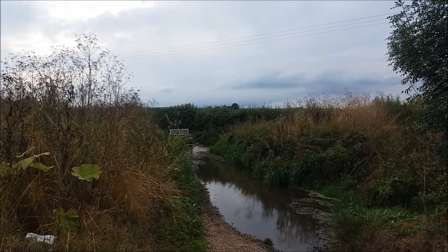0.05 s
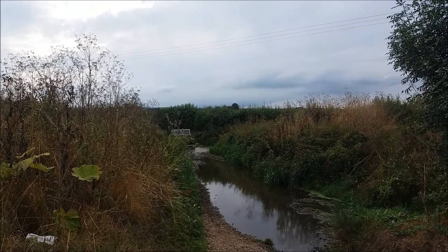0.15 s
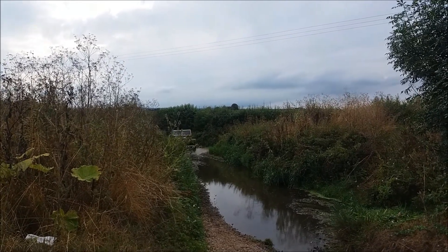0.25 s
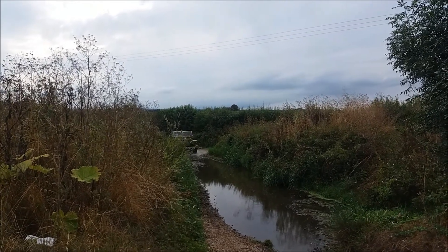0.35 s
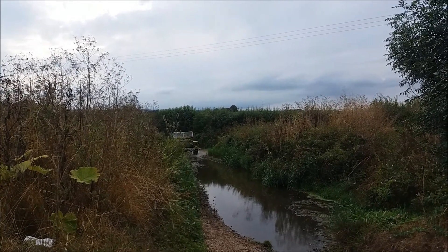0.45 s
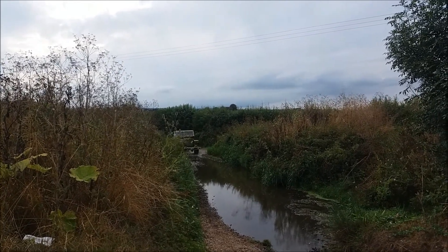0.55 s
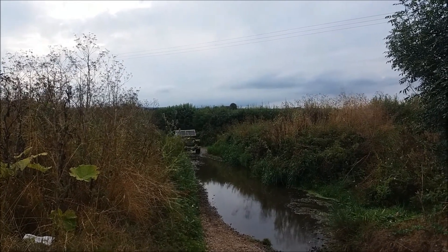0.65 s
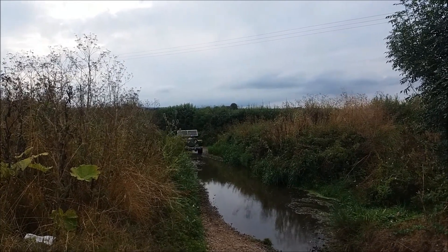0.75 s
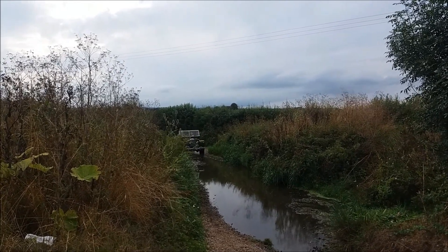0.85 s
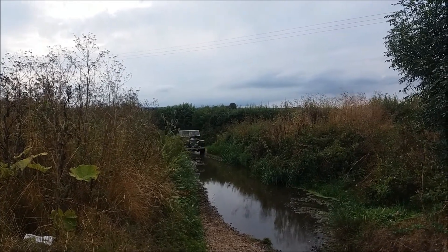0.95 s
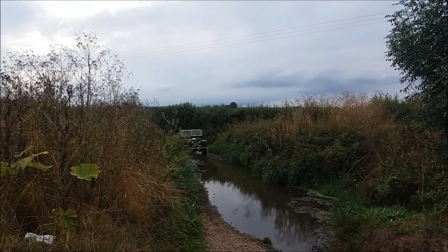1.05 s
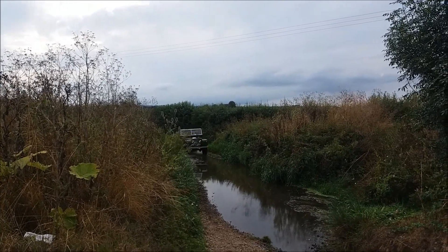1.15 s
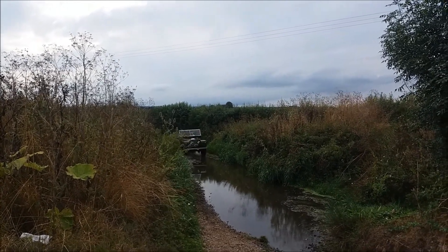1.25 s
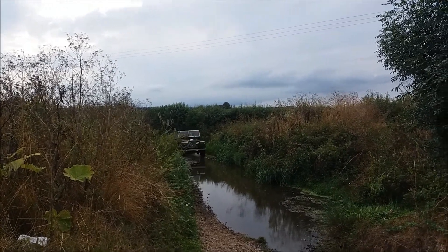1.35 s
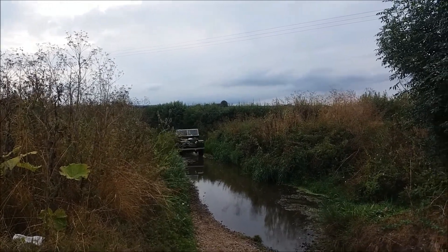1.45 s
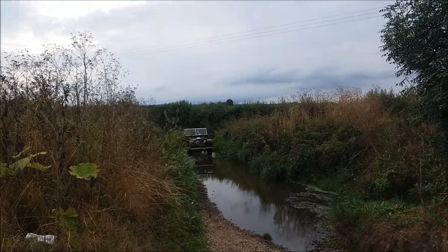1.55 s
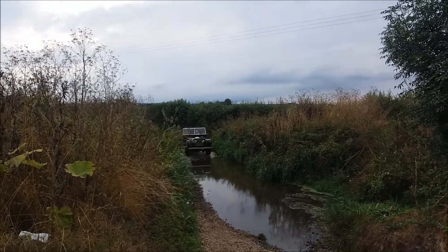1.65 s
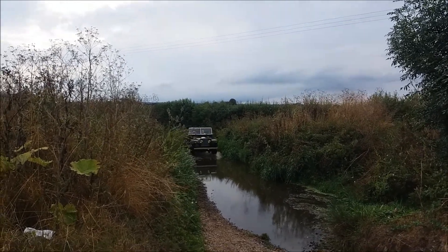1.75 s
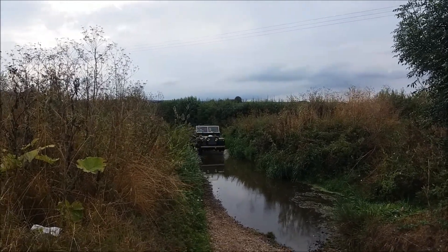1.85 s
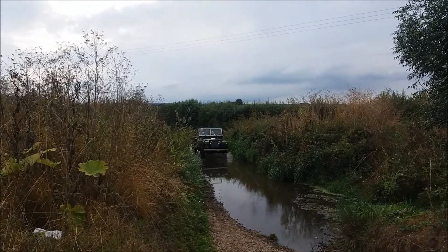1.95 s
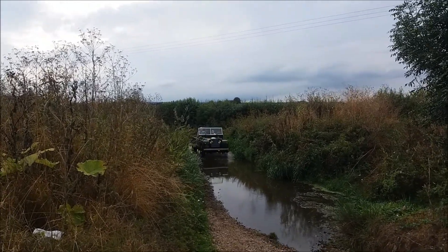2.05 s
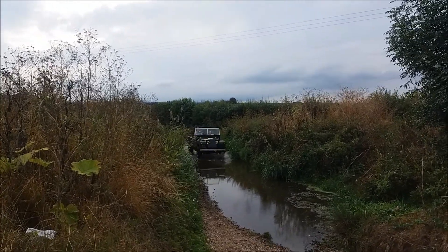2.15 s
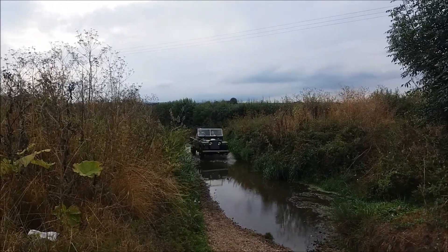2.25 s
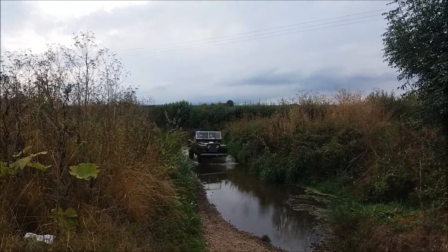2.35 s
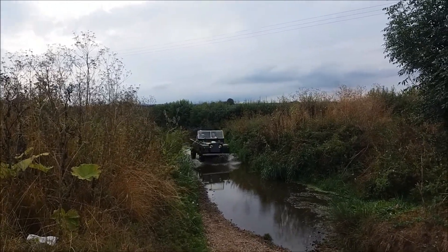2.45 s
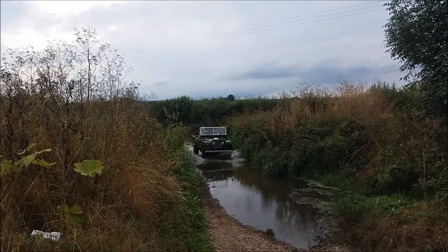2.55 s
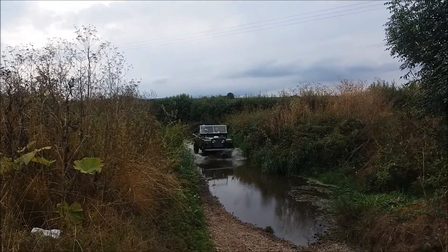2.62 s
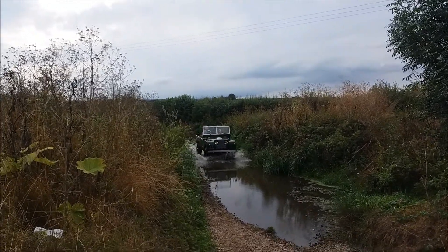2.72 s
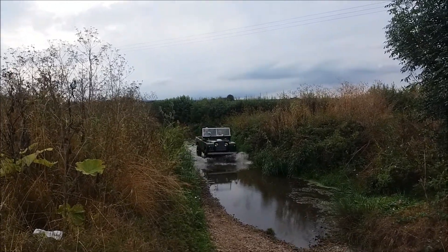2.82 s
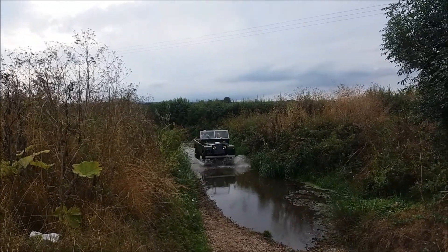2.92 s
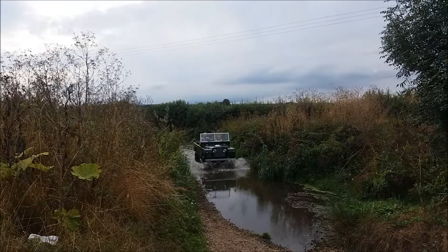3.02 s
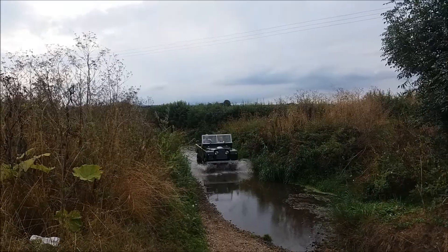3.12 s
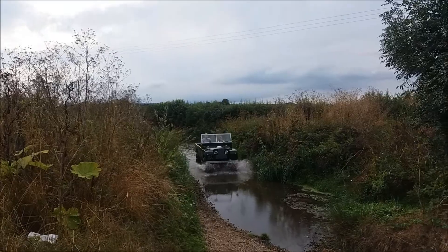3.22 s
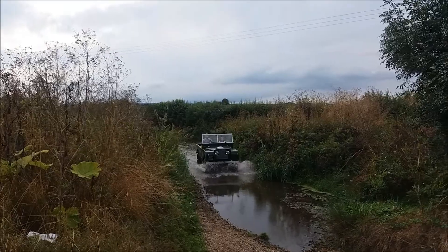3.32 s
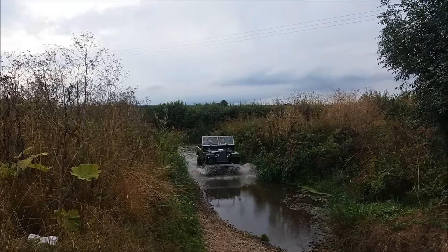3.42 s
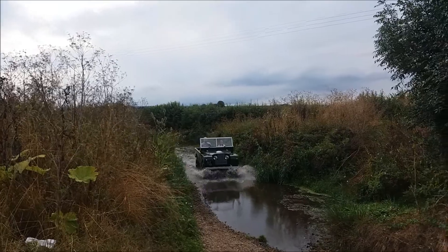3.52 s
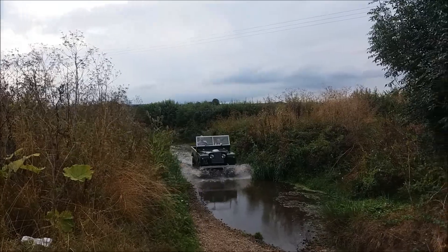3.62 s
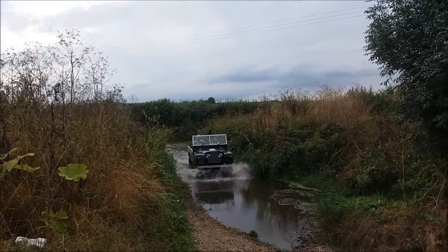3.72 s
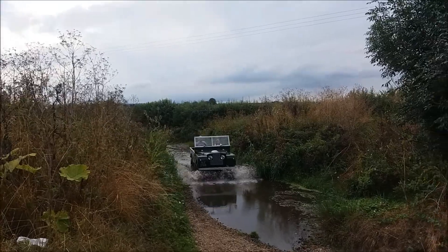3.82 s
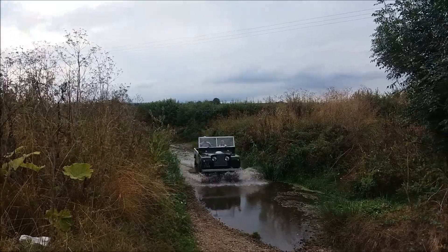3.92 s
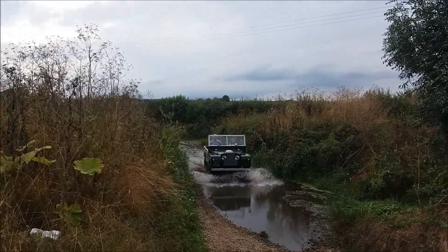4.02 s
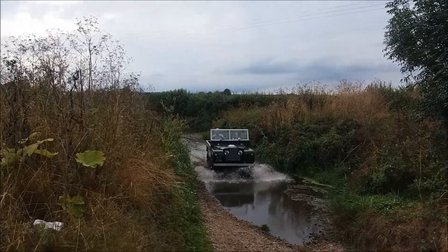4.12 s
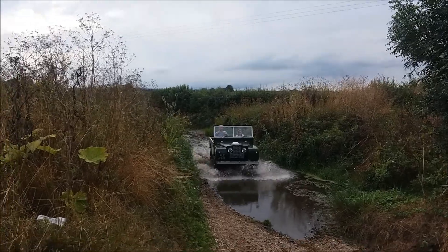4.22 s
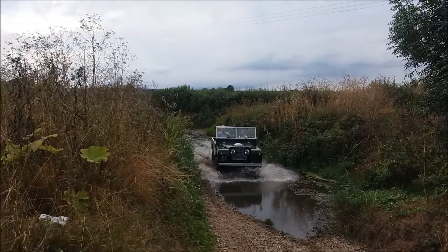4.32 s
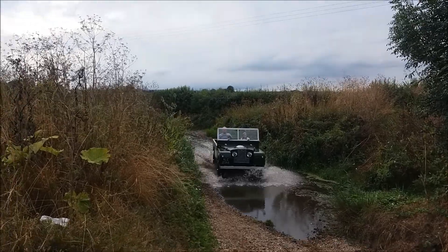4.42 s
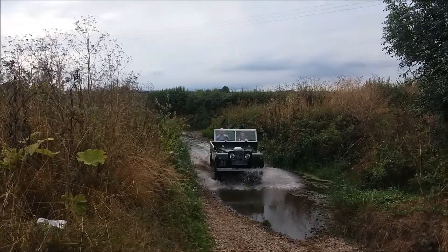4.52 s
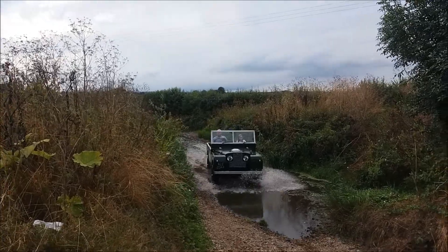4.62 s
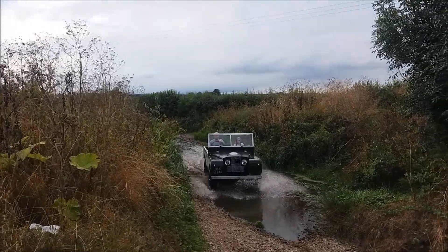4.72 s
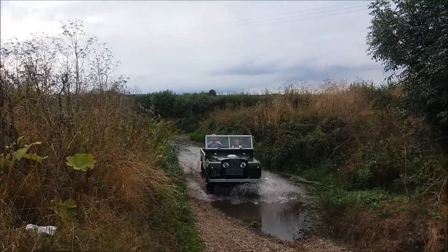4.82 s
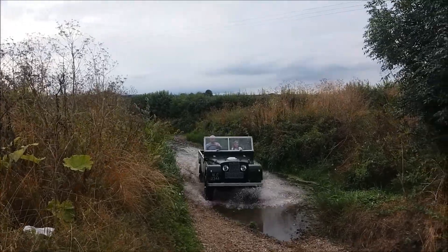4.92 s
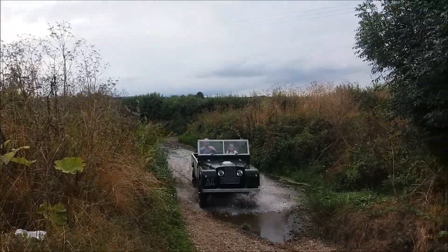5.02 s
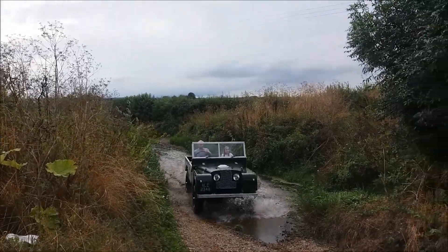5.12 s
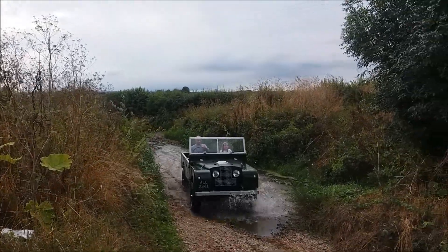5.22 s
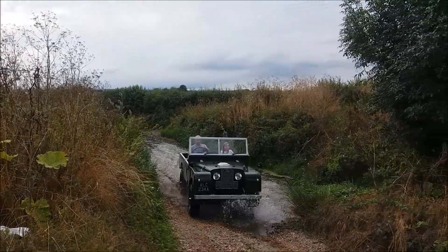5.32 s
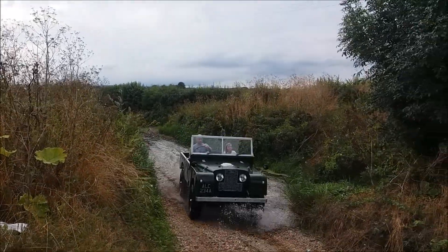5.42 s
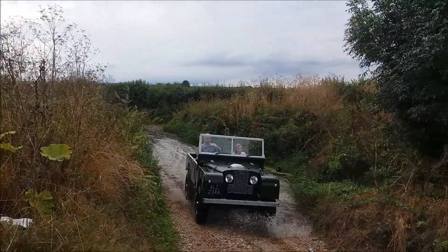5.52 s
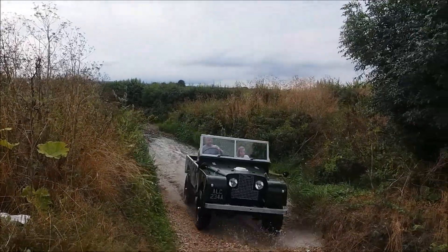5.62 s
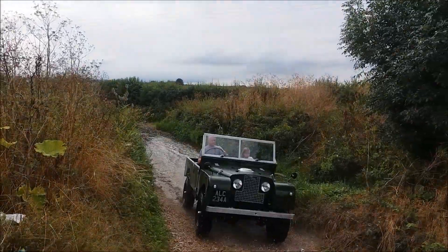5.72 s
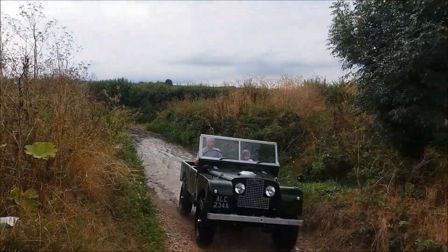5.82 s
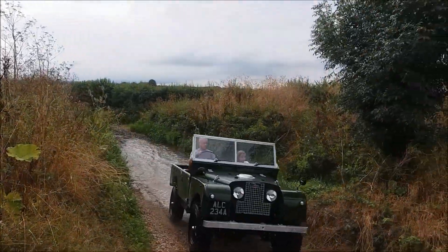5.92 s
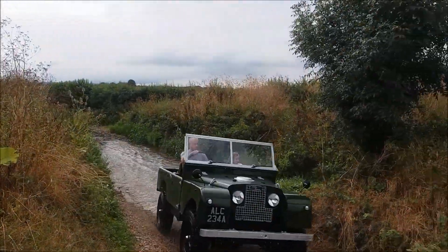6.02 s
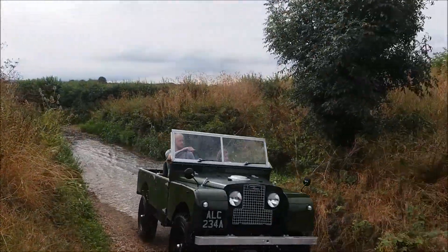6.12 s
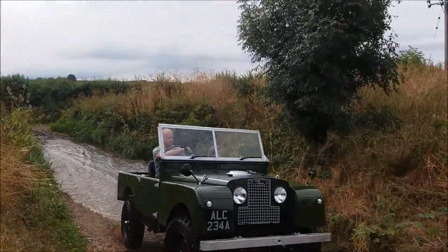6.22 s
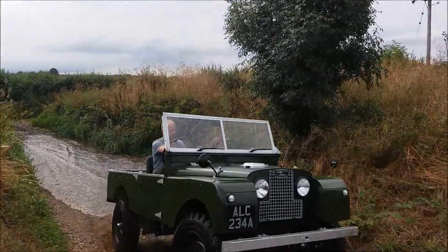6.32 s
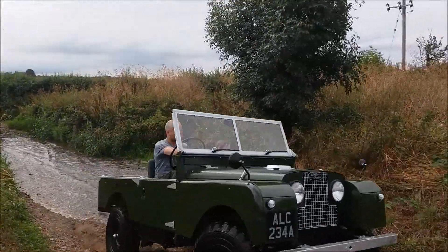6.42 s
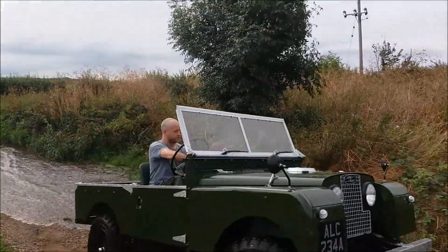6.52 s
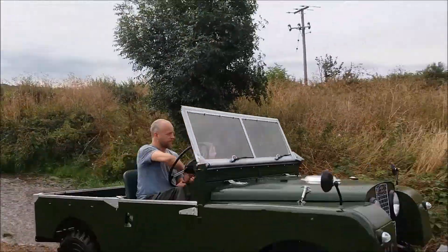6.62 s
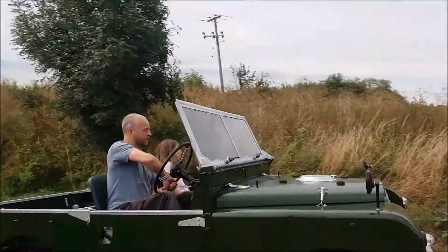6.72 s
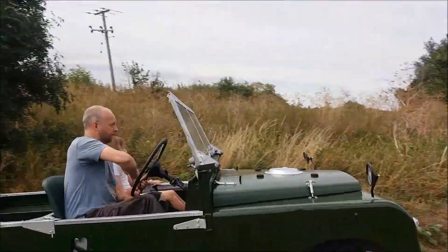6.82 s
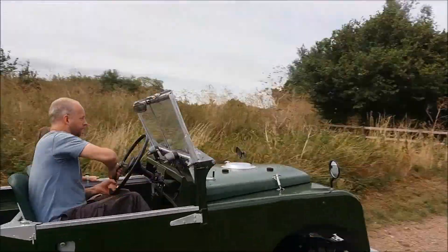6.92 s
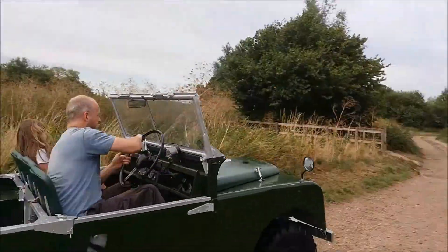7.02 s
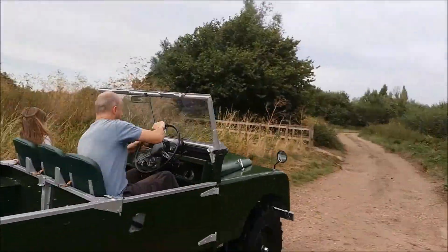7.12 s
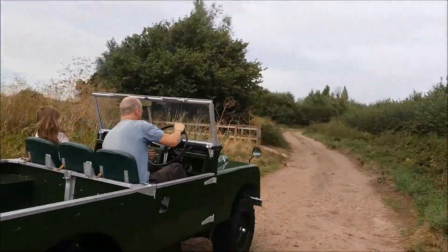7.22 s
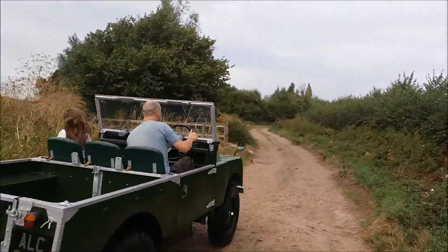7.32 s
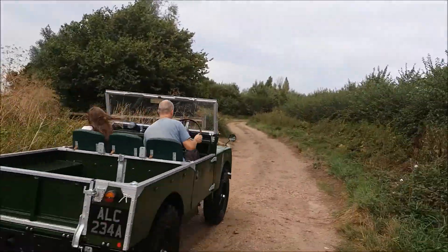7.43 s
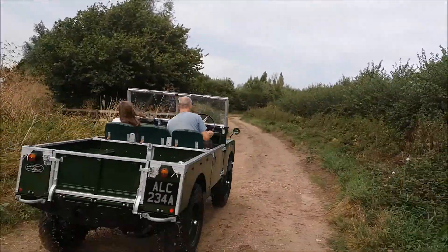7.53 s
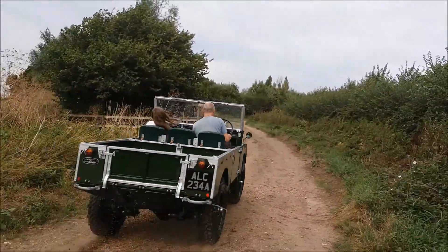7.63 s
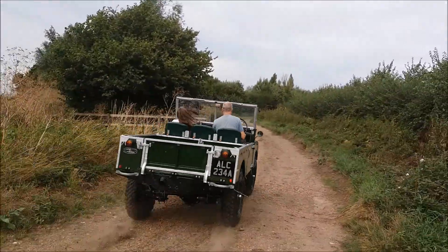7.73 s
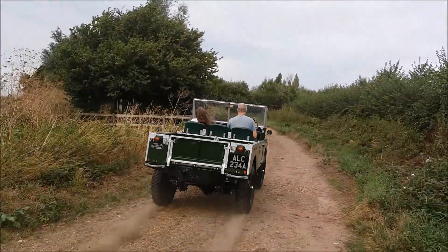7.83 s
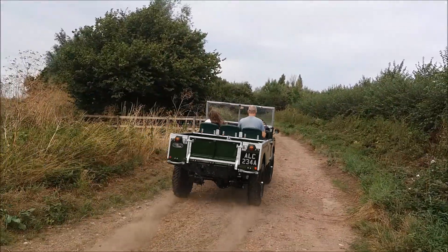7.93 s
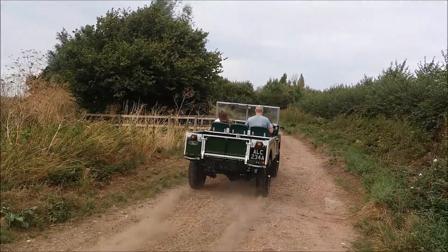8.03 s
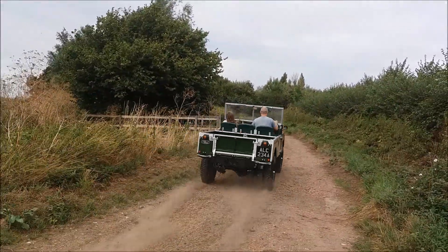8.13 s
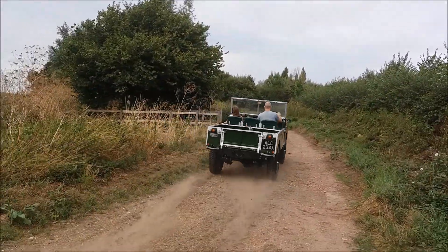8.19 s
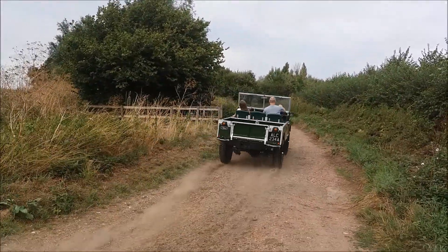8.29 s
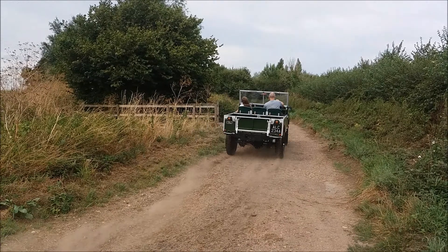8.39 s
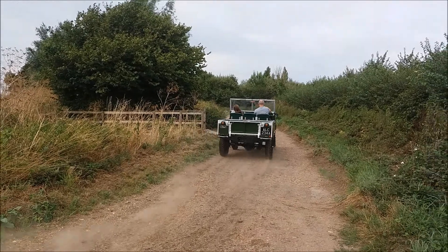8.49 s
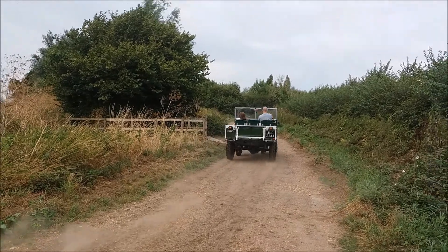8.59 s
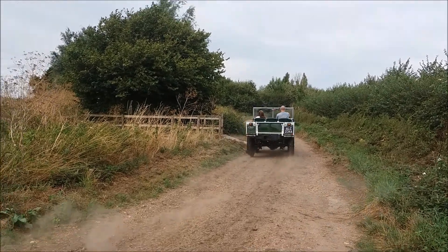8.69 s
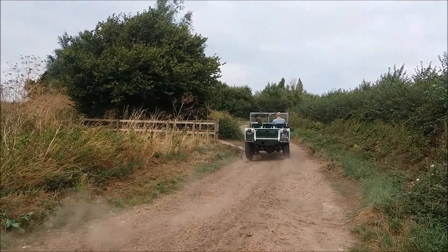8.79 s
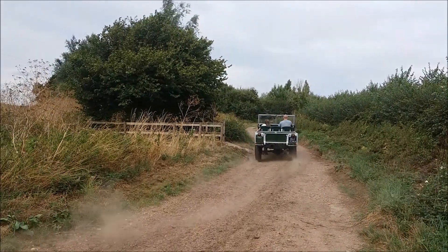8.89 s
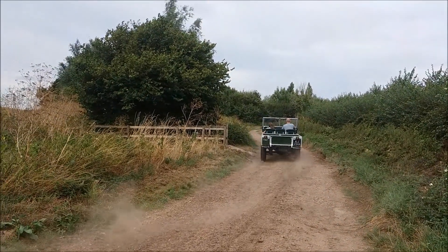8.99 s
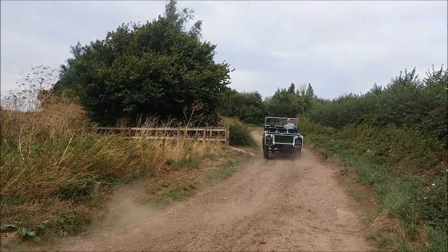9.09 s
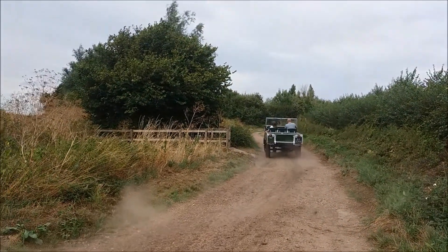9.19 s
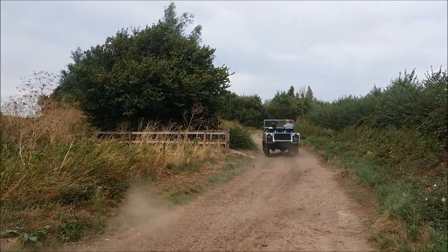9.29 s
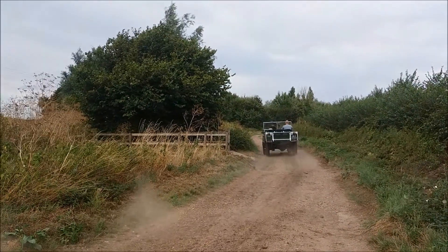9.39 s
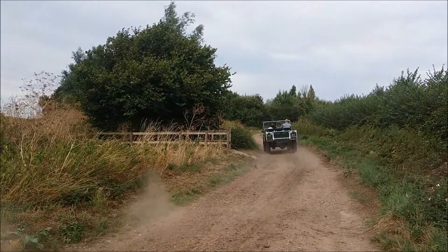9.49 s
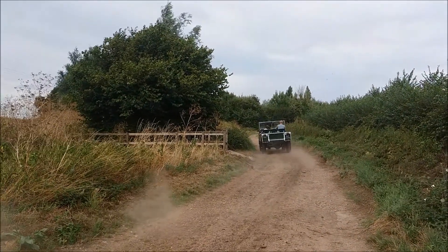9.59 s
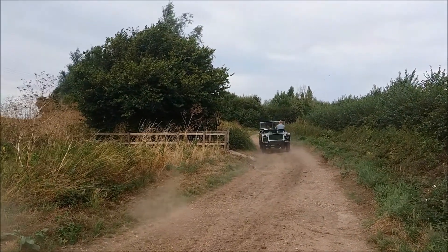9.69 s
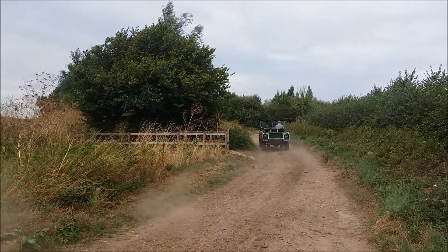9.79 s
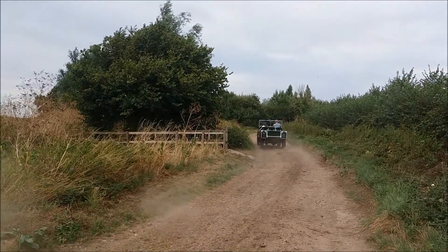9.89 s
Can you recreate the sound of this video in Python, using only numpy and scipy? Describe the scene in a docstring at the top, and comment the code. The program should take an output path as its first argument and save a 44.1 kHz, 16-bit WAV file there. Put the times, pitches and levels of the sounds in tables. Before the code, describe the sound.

Outdoors at a fixed microphone beside a flooded track, an old open V8 off-road vehicle approaches with a low steady drone and rushing, splashing water. Near five seconds the revs jump, it climbs out with thuds and clatter, and growls past within a few metres around seven seconds. The throttle lifts briefly, then it pulls away over crunching, ticking gravel, growing fainter.

```python
"""A V8 four-wheel-drive wades along a flooded track, climbs out, passes close and leaves over gravel.
Its exhaust note is a bank of sines locked to the engine cycle; pulses per firing excite rasp and clatter.
Water, gravel and rumble are coloured noise and grains; panels and single stones are struck resonances.
Squeaks are short bursts of resonant noise, and a faint steady hiss lies behind it all."""
import sys
import numpy as np
from scipy import signal
from scipy.fft import rfft, irfft, next_fast_len
from scipy.io import wavfile

SR = 44100
rng = np.random.default_rng(int(sys.argv[2]) if len(sys.argv) > 2 else 0)


def unload_audio(sound):
    """Save the sound as a 16-bit wav file, at the path given as the first command line argument."""
    columns = np.transpose(np.atleast_2d(sound))
    # keep every value between -1 and 1, then stretch to whole-number steps
    steps = np.round(np.clip(columns, -1, 1) * 32767)
    wavfile.write(sys.argv[1], SR, steps.astype(np.int16))


N = 438794
TIME = np.arange(N) / SR

# engine speed before its slight wander: t/s, firing rate/Hz
REVS = [(0.0, 81.51), (0.4, 79.6), (1.3, 80.51), (2.2, 80.56), (3.0, 81.97), (3.4, 85.94), (4.0, 85.77),
        (4.55, 86.76), (4.8, 104.37), (5.0, 118.35), (5.2, 120.66), (5.43, 152.06), (5.6, 134.81),
        (5.8, 132.47), (6.08, 122.27), (6.2, 135.06), (6.32, 140.49), (6.42, 150.0), (6.51, 164.01),
        (6.63, 174.92), (6.77, 163.01), (6.87, 180.67), (6.98, 193.02), (7.1, 215.04), (7.2, 224.92),
        (7.33, 232.0), (7.46, 238.36), (7.58, 210.28), (7.7, 178.52), (7.82, 172.0), (7.96, 156.12),
        (8.08, 158.4), (8.2, 162.99), (8.4, 160.52), (8.58, 164.99), (8.72, 162.85), (8.9, 177.47),
        (9.15, 178.0), (9.25, 167.0), (9.48, 166.5), (9.6, 157.53), (9.7, 155.16), (9.84, 175.22),
        (9.95, 184.44)]
# the driver's foot: t/s, throttle (0-1)
THROTTLE = [(0.0, 0.57), (3.0, 0.57), (4.5, 0.4), (4.8, 0.85), (5.2, 0.78), (5.42, 1), (5.55, 0.36),
            (5.85, 0.69), (6.1, 0.58), (6.48, 0.93), (6.7, 0.9), (7.1, 0.86), (7.3, 0.56), (7.5, 0.25),
            (7.62, 0.12), (7.88, 0.0), (8.02, 0.84), (8.9, 0.94), (9.0, 0.53), (9.18, 0.74), (9.3, 0.49),
            (9.45, 0.24), (9.58, 0.34), (9.7, 0.49), (9.9, 0.98)]
# each firing in the engine cycle: relative strength/dB, delay through its header/s
CYLINDERS = [(-2, 0.0042), (-2.5, 0.0049), (0, 0.0044), (-4, 0.0038), (-2.5, 0.003), (1, 0.0029),
             (-2, 0.001), (1, 0.0037)]

# the drive past: moment of closest approach (s), road speed (m/s), closest distance (m)
PASS_S, SPEED_M_PER_S, CLOSEST_M = 6.86, 4.83, 3.55
# the wheels climb out of the ford between these times (s)
BANK_START_S, BANK_END_S = 5.3, 6.44
# square side-on, the door screens engine bay and tailpipe: moment (s), length (s)
SCREEN_S, SCREEN_LENGTH_S = 6.97, 0.19


def engine():
    """Exhaust note, hum, pipe rasp and mechanical clatter all turn on one crankshaft."""
    # side facing the microphone: t/s, side (0 = nose, 1 = flank, 2 = tail)
    facing_curve = [(6.2, 0), (6.5, 1), (7.15, 1), (8.0, 2)]
    [firing_hz] = in_time(REVS)
    [throttle] = in_time(THROTTLE)
    [facing] = in_time(facing_curve)
    screen_db = 5 * swell(SCREEN_S, SCREEN_LENGTH_S)
    cycle_hz = firing_hz * (1 + 0.002 * drift(13.8)) / len(CYLINDERS)
    cycle = np.cumsum(cycle_hz) / SR
    note = exhaust_note(cycle, cycle_hz, throttle, facing, waver_db=1.59)
    note *= from_db(spreading_db() - 3.5)
    rasp = pipe_rasp(cycle, throttle, facing, screen_db)
    clatter = mechanical_clatter(cycle, throttle, screen_db)
    return note + hum(cycle) + rasp + crossfade(0, clatter, BANK_START_S, BANK_END_S)


def exhaust_note(cycle, cycle_hz, throttle, facing, waver_db):
    """The two banks fire unevenly, so many cycle orders sound; each swells as it crosses a pipe resonance."""
    # relative levels: multiple of the engine cycle, coasting level/dB, full-throttle level/dB
    orders = [(3.0, -15.5, -18), (4.0, -23, -31), (5.0, -23, -10), (6.0, -8, -33), (7.0, -24, -26),
              (8.0, -24, -4), (9.0, -34, -26), (10.0, -34.8, -14.5), (11.0, -28.5, -16),
              (12.0, -32.5, -21.5), (13.0, -35.5, -16.5), (14.0, -34.5, -30), (15.0, -42.5, -32.5),
              (16.0, -28.5, -19.5), (17.0, -29.5, -28), (18.0, -32, -28.5), (19.0, -30.5, -28),
              (20.0, -36, -25.5), (21.0, -36.0, -23.5), (22.0, -36.5, -32.5), (23.0, -39.5, -35.5),
              (24.0, -34.9, -30.5), (25.0, -42, -34), (26.0, -51.5, -40), (27.0, -45.5, -37.5),
              (28.0, -42, -34.5), (29.0, -43, -43.5), (30.0, -41, -40.5), (32.0, -48, -37.5),
              (35.0, -43, -42), (36.0, -39, -37.5), (40.0, -33.5, -47.5)]
    # exhaust pipe resonances: f/Hz, gain heard from ahead/dB, alongside/dB, from behind/dB
    pipe = [(30.0, -44.7, -28.0, -28.0), (48.0, -25.5, -8.3, -13), (66.7, -4.5, -9, -7.6),
            (84.0, -6, -5.5, -6.4), (108.0, -10, -16.5, -12), (136.6, -3, -13, 1.2), (170, -2.2, -5, -3.5),
            (197, -12.3, -8, -1.3), (224.7, 2.5, -3, 7.5), (264.5, -5, 3.5, 15), (298, -5, -0.7, 7),
            (353, 1, -1.9, -1.4), (394, -4.5, 4.5, -5), (472, 9, 3.3, 1), (567, -3, 5.5, -4.5),
            (700.0, -12.5, 4, -14)]
    pipe_hz, *sides_db = np.transpose(pipe)
    shares = [np.maximum(1 - abs(facing - side), 0) for side in range(len(sides_db))]
    # reeds muffle the exhaust above 108 Hz (dB per octave), until it is in the clear at 3.1 s
    reeds_db_per_octave = 10 * np.interp(TIME, [0, 3.1], [1, 0])
    # alongside, the open tub growls round 290 Hz while the door dulls the note above 370 Hz
    tub_hz, tub_width, door_hz = 290, 0.15, 370
    tub_db = 5 * swell(7.0, 0.16)
    door_db = 6 * swell(SCREEN_S, SCREEN_LENGTH_S)
    # combustion is unsteady while the throttle is worked and steadies as the speed settles
    unsteady_db = waver_db * np.interp(
        TIME,
        [4.4, 4.8, 6.2, 6.6, 7.4, 7.8, 8.0, 8.7, 9.0, 9.5, 9.9],
        [1.7, 2, 2.2, 1.1, 1.1, 1.4, 1, 1.1, 1.6, 2.8, 1.8])
    # the gas flow scatters the timing of orders above 13 (radians per order)
    scatter = 0.054 * np.interp(
        TIME, [4.2, 4.8, 6.1, 6.5, 7.2, 8.0, 9.2], [.8, 1.3, .9, .45, .3, .4, .9])
    out = np.zeros(N)
    for multiple, coasting_db, pulling_db in orders:
        order = round(multiple)
        log_hz = np.log(order * cycle_hz)
        pipe_db = sum(share * np.interp(log_hz, np.log(pipe_hz), side_db)
                      for share, side_db in zip(shares, sides_db))
        db = coasting_db + throttle * (pulling_db - coasting_db) + pipe_db
        db += unsteady_db * drift(8.8)
        db += tub_db * np.exp(-((log_hz - np.log(tub_hz)) / tub_width) ** 2)
        db -= door_db * np.clip((log_hz - np.log(door_hz)) / .2, 0, 1)
        db -= reeds_db_per_octave * np.maximum(log_hz - np.log(108), 0) / np.log(2)
        # the silencer delays the higher orders more and smears the beats into a drone
        phase = 2 * np.pi * order * cycle - 2 * np.pi * order ** 2 / 5 + rng.normal(0, .4)
        phase += scatter * max(order - 13, 0) * drift(22)
        out += np.sqrt(2) * from_db(db) * np.cos(phase)
    return out


def pipe_rasp(cycle, throttle, facing, screen_db):
    """Turbulent gas follows each firing pulse and rasps in the pipe, in a bright or a darker colour."""
    # bright rasp spectrum: f/Hz, relative level/dB per Hz
    bright_colour = [(250, -36), (350, -52), (430, -4.5), (510, 1), (600, 1), (700, -3.5), (860, -9.5),
                     (1300, -45)]
    # dark rasp spectrum: f/Hz, relative level/dB per Hz
    dark_colour = [(250, -7), (400, 1), (480, -5.5), (560, -12), (660, -24), (800, -28), (1000, -13),
                   (1300, -32.5)]
    gas = firings(cycle, rough=0.22, jitter_s=.00008, puff_s=0.0089, turbulence=1.0)
    # brightest at the start and just after the closest point
    dark = np.interp(TIME, [1.8, 3.3, 5.9, 6.35, 6.85, 7.1, 7.7, 8.0],
                     [0, 1, 0.9, 0.54, 0.77, 0.066, 0, 0.95])
    rasp = (1 - dark) * coloured(gas, bright_colour)
    rasp += dark * from_db(0.5) * coloured(gas, dark_colour)
    behind = np.maximum(facing - 1, 0) ** 2
    level_db = -24.5 + 4.5 * throttle - 8.5 * behind + 1.42 * spreading_db()
    # the near flank shades the rasp for longer than the door does
    shade_db = 1.5 * swell(SCREEN_S, 2 * SCREEN_LENGTH_S)
    return rasp * from_db(level_db - shade_db - screen_db)


def mechanical_clatter(cycle, throttle, screen_db):
    """Rough firing pulses shake the engine bay; once past, they sound through the driveline as a whine."""
    # engine bay spectrum: f/Hz, relative level/dB per Hz
    clatter_colour = [(600, -35), (850, -5), (1080, 6.5), (1300, 6), (1550, 5), (1900, -9.5), (2500, -8),
                      (4000, -42)]
    # driveline spectrum: f/Hz, relative level/dB per Hz
    driveline_colour = [(600, -6.5), (780, 1), (960, 8), (1080, 2), (1250, -10), (1600, -5), (1900, -13.5),
                        (2500, -31)]
    # far off the track bends and the mechanical sound lifts: t/s, gain/dB
    bend = [(9.2, 0), (9.9, 11)]
    metal = firings(cycle, rough=0.91, jitter_s=.00008, puff_s=0.025, turbulence=2.2)
    # driveline against engine bay: extra fall with distance, and 4 dB more pulling than coasting
    whine_db = 6 + 0.72 * spreading_db() + 4 * (throttle - .5) + in_time(bend)[0]
    whine = coloured(metal, driveline_colour) * from_db(whine_db)
    clatter = crossfade(coloured(metal, clatter_colour), whine, 7.55, 7.9)
    # falls faster than free spreading, as the body screens it
    return clatter * from_db(-22.5 + 2.52 * spreading_db() - screen_db)


def firings(cycle, rough, jitter_s, puff_s, turbulence):
    """A sharp pulse per firing, late by its header's length, is followed by a puff of turbulent gas."""
    number = np.arange(int(cycle[-1] * len(CYLINDERS)))
    db, delay = np.array(CYLINDERS)[number % len(CYLINDERS)].T
    size, slip = rng.standard_normal((2000, 2))[number].T
    s = np.interp(number / len(CYLINDERS), cycle, TIME) + delay + jitter_s * slip
    pulses = np.zeros(N)
    pulses[np.clip(s * SR, 0, N - 1).astype(int)] = from_db(db) * (1 + rough * size)
    envelope = signal.lfilter([1], [1, -np.exp(-1 / (puff_s * SR))], pulses)
    puffs = envelope * rng.standard_normal(N)
    return rms_one(pulses) + turbulence * rms_one(puffs)


def hum(cycle):
    """Plain harmonics of the firing rate carry through the grille at low revs, then fade out."""
    # mean level at the closest distance, before the fade: multiple of the firing rate, level/dB
    harmonics = [(2, -33), (3, -35)]
    firing = 2 * np.pi * len(CYLINDERS) * cycle
    lines = sum(from_db(db + 3 * drift(6)) * np.cos(round(k) * firing) for k, db in harmonics)
    return crossfade(np.sqrt(2) * lines * from_db(spreading_db()), 0, 2.4, 5.4)


def water():
    """Bow wave and wheel splashes die away together as the vehicle leaves the ford."""
    return crossfade(bow_wave() + splashes(), 0, 4.31, BANK_END_S)


def bow_wave():
    """Countless droplets wash in uneven surges through three colours as the vehicle nears."""
    # wash before the ford fades: t/s, level/dB
    flow = [(0, -48.5), (.3, -45), (.5, -43), (.6, -35), (.8, -31.5), (1.25, -30.5), (1.55, -29.5),
            (1.68, -34), (2.2, -34), (3.0, -31), (3.85, -34), (4.6, -30), (5.0, -28), (5.4, -24.5),
            (6.0, -23.5)]
    # far, middle and near spectra, each: f/Hz, relative level/dB per Hz
    far_colour = [(380, -47), (650, -14), (758, -20), (931, -6), (1070, -2.5), (1190, -8), (1270, -14.5),
                  (1560, 4), (1840, -2.5), (2090, 0.5), (2540, 3), (2850, -9), (3120, -4), (3410, -12.5),
                  (3830, -3), (4190, -17), (4580, -8.5), (5010, -26), (5410, -11.5), (6070, -16.5),
                  (6730, -23), (7460, -23.5), (8060, -30), (9900, -31), (14000, -53)]
    middle_colour = [(380, -19), (650, -3), (761, -12.5), (879, -3), (939, -0.5), (1100, 3.5), (1360, -8),
                     (1570, 2.5), (1880, -7), (2580, -2), (2830, -7.5), (3180, -4), (3490, -14.5),
                     (3830, -12), (4140, -17), (4480, -7.5), (5110, -15), (6060, -10), (6910, -21),
                     (9720, -23), (11100, -28.5), (12600, -38), (15000, -46)]
    near_colour = [(380, -45), (650, -17.5), (781, -14.5), (879, -4.5), (1060, 2), (1470, -4.5),
                   (1670, 0.5), (1960, -5.5), (2480, 1.5), (2870, -8), (3360, -2.5), (4910, -11.5),
                   (5750, -8), (6220, -14), (9600, -20), (13900, -36), (15000, -43)]
    [flow_db] = in_time(flow)
    far = coloured(grains(700, 2.2, 0), far_colour) * from_db(1.4 * drift(22))
    middle = coloured(grains(1200, 2.4, 0), middle_colour) * from_db(0.67 * drift(10))
    near = coloured(grains(2000, 1.5, 0), near_colour) * from_db(0.51 * drift(18))
    approaching = crossfade(far, middle, 1.4, 3.78)
    return crossfade(approaching, near, 3.27, 5.57) * from_db(flow_db)


def splashes():
    """A wheel drops into a hole and throws up water, which slaps down as a swell of grains."""
    # splashes before the ford fades: t/s, peak level/dB, rise/s, fall/s
    throws = [(.62, -42, .015, 0.044), (.72, -36, 0.034, 0.044), (.91, -28.5, 0.06, 0.066),
              (1.07, -27, 0.059, 0.082), (1.15, -33, .02, 0.066), (1.44, -37, .01, .03),
              (1.54, -34, .015, 0.032), (2.86, -35, .008, .03), (3.07, -44, 0.0093, .03),
              (5.36, -29, .03, 0.045), (5.8, -21, 0.074, 0.041)]
    # slapping water: f/Hz, relative level/dB per Hz
    plunge_colour = [(1300, -9), (1600, -3), (2450, 10), (2900, 5.5), (3300, 5.5), (3900, 5), (4200, -13),
                     (4550, 3), (5000, -11), (5700, -2), (7500, -14.5), (10500, -23), (13000, -41)]
    thrown = sum(from_db(db) * swell(s, np.where(TIME < s, rise, fall))
                 for s, db, rise, fall in throws)
    return thrown * coloured(grains(650, 3.0, -3.5), plunge_colour) * from_db(1.2 * drift(35))


def gravel():
    """Loose stones crunch and tick under the tread, duller with distance."""
    # near and far crunch spectra, each: f/Hz, relative level/dB per Hz
    near_colour = [(1120, -26), (1900, -0.5), (2520, -7), (2770, -4), (3030, -1), (3420, -6.5), (3740, -4),
                   (6160, -7), (9070, -16.5), (12300, -26.5), (15500, -31)]
    far_colour = [(1120, -25), (1900, -2.5), (2090, -24), (2330, 3), (2560, -5), (2800, -3.5), (3480, -7.5),
                  (4230, -14), (4910, -5.5), (6610, -26), (8090, -36), (8380, -30), (9230, -39),
                  (9560, -48), (15500, -47.5)]
    [throttle] = in_time(THROTTLE)
    near = coloured(grains(900, 0.91, -0.85), near_colour) * from_db(1.1 * drift(14))
    far = coloured(grains(540, 3.2, 1.4), far_colour) * from_db(0.38 * drift(22))
    ticks = from_db(-6) * coloured(pebbles(), near_colour)
    ticks *= np.interp(TIME, [7.3, 8.2, 9.0, 9.4], [1, 1, .8, .25])
    # once past, the crunch sits lower, but the driven wheels scrabble 7.5 dB harder at full throttle
    gone = np.interp(TIME, [7.8, 9.0], [0, 1])
    level_db = -31 + 1.01 * spreading_db() + 7.5 * gone * (throttle - 1.62)
    crunch = (crossfade(near, far, 8.25, 9.3) + ticks) * from_db(level_db)
    return crossfade(0, crunch, BANK_START_S, BANK_END_S)


def pebbles():
    """Each pebble squeezed out by the tread cracks and rings briefly at one of eight pitches."""
    per_s, ring_cycles = 80, 14
    pops = (rng.random(N) < per_s / SR) * from_db(rng.uniform(-17, 0, N))
    pitches = np.geomspace(2400, 9000, 8)
    dealt = rng.integers(0, len(pitches), N)
    rings = sum(ring(pops * (dealt == k), hz, ring_cycles / hz) for k, hz in enumerate(pitches))
    envelope = signal.lfilter([1], [1, -np.exp(-1 / (0.0008 * SR))], pops + 1e-18)
    cracks = envelope * rng.standard_normal(N)
    return .5 * rms_one(rings) + rms_one(cracks)


def rumble():
    """Wheels and body rumble as low noise, and drum in bursts over rough patches."""
    # steady rumble: f/Hz, relative level/dB per Hz
    rumble_colour = [(25, -63), (42, -35), (60, -10), (90, -2), (150, -3), (250, -3), (400, -10.5),
                     (520, -21), (800, -24.5)]
    # rough patches: t/s, peak level/dB, length/s
    bumps = [(1.42, -38, .04), (2.02, -33, 0.073), (2.66, -34, .03), (2.93, -33, .07), (3.628, -27, .025),
             (3.76, -31, .03), (4.045, -26, 0.022), (4.9, -30.5, 0.37), (5.948, -23, .06), (6.12, -21, .04),
             (7.74, -17, .04), (8.65, -27, .05), (8.97, -24, .04), (9.11, -29, .04), (9.55, -36.5, .25),
             (9.93, -24, 0.036)]
    # drumming: f/Hz, relative level/dB per Hz
    bump_colour = [(50, -13), (78, -2), (110, -1.5), (160, -8.5), (230, -19.5)]
    level_db = -20 + 1.415 * spreading_db() + 1.55 * drift(9)
    # it eases on the smooth crest of the bank
    crest_db = 5 * swell(7.15, 0.41)
    steady = coloured(rng.standard_normal(N), rumble_colour) * from_db(level_db - crest_db)
    drumming = sum(from_db(db) * swell(s, length) for s, db, length in bumps)
    return steady + drumming * coloured(rng.standard_normal(N), bump_colour)


def body():
    """Blows set the axles, tub, load bed and single stones ringing; metal rattles and squeaks."""
    # low thuds from water and axles: t/s, level before the mode gains/dB
    thuds = [(1.988, -25), (3.777, -18), (4.041, -15.5), (4.209, -21), (6.179, -15), (6.27, -11),
             (7.712, -9), (7.739, -9)]
    # the empty load bed booms: t/s, level before the mode gains/dB
    booms = [(8.708, -16), (8.722, -17), (8.735, -17), (9.653, -25)]
    # the tub knocks over ruts: t/s, level before the mode gains/dB
    knocks = [(6.194, -15.5), (6.278, -13.5), (6.725, -20), (7.563, -16), (7.691, -10.5), (8.705, -26),
              (9.191, -30), (9.516, -35), (9.653, -33)]
    # stones crack under the tread: t/s, level before the mode gains/dB
    stones = [(7.838, -23), (7.893, -34), (7.925, -25), (7.992, -22), (8.047, -23), (8.074, -22),
              (8.198, -25), (8.418, -36), (8.493, -25), (8.499, -23), (8.643, -32), (8.664, -30),
              (8.763, -26), (9.062, -38), (9.075, -38), (9.152, -43), (9.212, -41), (9.291, -42)]
    # a cracking stone rings with: f/Hz, gain/dB, t60/s
    stone_modes = [(3100, -8, .007), (5200, -0.5, .006), (7900, -3.5, .004), (10800, -14, .003)]
    blows = strikes(thuds, [(79, -4, 0.078), (126.0, -0.5, 0.06), (190, 0.5, 0.046)])
    blows += strikes(booms, [(215, 2, .06), (352, 3.5, 0.052)])
    blows += strikes(knocks, [(410.0, 11.0, 0.015), (519, 2.0, 0.04), (746, -12.0, 0.038),
                              (1110, -7.0, 0.047), (1460, -15.0, 0.022)])
    blows += strikes(stones, stone_modes)
    return blows + judder() + rattles() + squeaks()


def judder():
    """At top revs the strongest firing shakes the tub once per engine cycle, in eight fading beats."""
    start_s = 7.2235
    cycle_s = len(CYLINDERS) / np.interp(start_s + .1, *np.transpose(REVS))
    beats = [(start_s + k * cycle_s, -7.5 - 0.7 * k) for k in range(8)]
    modes = [(462, 5, 0.053), (553, 3, 0.031), (700, -0.5, 0.0087),
             (1070, -16, 0.027), (1430, -18, .015)]
    return strikes(beats, modes, uneven_db=0.3)


def rattles():
    """Loose body metal and flung stones rattle in decaying bursts of grains."""
    # bursts, 8 dB above the mean level heard: t/s, onset level/dB, length/s
    bursts = [(2.254, -28.5, 0.057), (6.247, -19, 0.023), (6.417, -18.5, 0.029), (6.555, -21, 0.041),
              (6.718, -16.5, 0.026), (7.23, -5, 0.018), (7.601, -18.5, 0.049), (7.747, -17.5, 0.025),
              (7.957, -23, 0.013), (8.069, -21.5, 0.023), (8.289, -22, .007), (8.515, -21.5, .006),
              (8.547, -27, 0.0058), (8.666, -24, 0.0089), (8.76, -27.5, 0.015), (8.933, -30, 0.0082),
              (9.21, -36, 0.012), (9.751, -35.5, 0.066)]
    # rattling metal: f/Hz, relative level/dB per Hz
    rattle_colour = [(700, -12), (1400, 7.5), (2500, 5), (3300, 3.5), (5500, -1), (7500, -5.5),
                     (10000, -16), (15000, -31)]
    shaking = np.zeros(N)
    for s, db, length in bursts:
        start = int(s * SR)
        age = np.maximum(TIME[start:] - s, 0) / length
        shaking[start:] += from_db(db) * np.exp(-np.minimum(age, 12) ** 1.4)
    metal = coloured(grains(1300, 2.0, -2), rattle_colour)
    return shaking * metal * from_db(-8 + 2.0 * drift(130))


def squeaks():
    """Dry springs and brakes squeak as noise through a narrow resonance."""
    # squeaks: t/s, f/Hz, peak level/dB, length/s
    scrapes = [(6.62, 14500, -68, .06), (7.216, 14750, -55.5, .09), (7.729, 5400, -26, 0.0045),
               (7.936, 6500, -34, 0.021)]
    out = np.zeros(N)
    for s, hz, db, length in scrapes:
        scrape = rms_one(ring(rng.standard_normal(N), hz, t60=0.006))
        out += from_db(db) * swell(s, length) * scrape
    return out


def open_air():
    """Reeds and open air give a faint steady hiss of coloured noise."""
    # hiss: f/Hz, relative level/dB per Hz
    air_colour = [(600, -3), (1000, 11.5), (3000, -6), (8000, -12), (15500, -25.5)]
    return from_db(-51.0) * coloured(rng.standard_normal(N), air_colour)


def spreading_db():
    """Loss with distance along a straight track, 0 dB at the closest point."""
    distance_m = np.hypot(CLOSEST_M, SPEED_M_PER_S * (TIME - PASS_S))
    return -20 * np.log10(distance_m / CLOSEST_M)


def strikes(rows, modes, uneven_db=3.5):
    """Blows (t/s, dB) ring modes (f/Hz, dB, t60/s) in a varying mix; a panel radiates no slow push."""
    s, db = np.transpose(rows)
    out = np.zeros(N)
    for hz, mode_db, t60 in modes:
        clicks = np.zeros(N)
        clicks[(s * SR).astype(int)] = from_db(db + mode_db + rng.normal(0, uneven_db, len(s)))
        no_push = signal.butter(4, .62 * hz, "high", fs=SR, output="sos")
        out += signal.sosfilt(no_push, ring(clicks, hz, t60))
    return out


def ring(clicks, hz, t60):
    """A unit click sets a decaying sine of initial height 1 ringing."""
    r, w = from_db(-60 / (t60 * SR)), 2 * np.pi * hz / SR
    return signal.lfilter([0, np.sin(w)], [1, -2 * r * np.cos(w), r * r], clicks + 1e-18)


def grains(per_s, spread_db, hiss_db):
    """Random clicks of uneven size over a hiss of countless smaller ones."""
    sizes = from_db(spread_db * np.minimum(rng.exponential(1, N), 4)) * rng.choice([-1, 1], N)
    clicks = sizes * (rng.random(N) < per_s / SR)
    return rms_one(clicks) + from_db(hiss_db) * rng.standard_normal(N)


def coloured(x, spectrum):
    """Give a signal a smooth spectrum with steep skirts; rms 1."""
    size = next_fast_len(N + 4096)
    hz, db = np.transpose(spectrum)
    log_hz = np.log(np.arange(size // 2 + 1) * SR / size + 1)
    below = np.maximum(np.log(hz[0]) - log_hz, 0)
    above = np.maximum(log_hz - np.log(hz[-1]), 0)
    gain = from_db(np.interp(log_hz, np.log(hz), db) - 80 * (below + above))
    return rms_one(irfft(rfft(x, size) * gain, size)[:N])


def drift(rate):
    """Slow random wander of rms 1, from low-passed noise with its corner near rate (Hz)."""
    # made at one value per 40 samples, after a run-in of 2000 values
    r = np.exp(-80 * np.pi * rate / SR)
    noise = rng.standard_normal(N // 40 + 2002)
    slow = signal.lfilter([1], [1, -2 * r, r * r], noise)[2000:]
    return np.interp(np.arange(N) / 40, np.arange(len(slow)), rms_one(slow))


def swell(s, length):
    """A bell-shaped rise and fall round a moment."""
    return np.exp(-np.minimum(abs(TIME - s) / length, 6) ** 2)


def crossfade(a, b, start, end):
    """Pass from one sound to another at even power."""
    share = np.clip((TIME - start) / max(end - start, 1e-3), 0, 1)
    return a * np.sqrt(1 - share) + b * np.sqrt(share)


def in_time(rows):
    """Each column of a curve at every sample."""
    s, *columns = np.transpose(rows)
    return [np.interp(TIME, s, column) for column in columns]


def rms_one(x):
    """Scale to rms 1."""
    return x / np.sqrt(np.mean(x ** 2) + 1e-20)


def from_db(db):
    """Decibels to gain."""
    return 10 ** (np.asarray(db) / 20)


def scene():
    """Everything in the open air, at one microphone."""
    return (engine() + water() + gravel() + rumble() + body() + open_air())[None]


def record(dry):
    """The highest peaks are rounded and the top is cut above 15.7 kHz."""
    rounded = dry / (1 + (dry / .95) ** 8) ** (1 / 8)
    top_cut = signal.ellip(10, .1, 90, 15700, fs=SR, output="sos")
    return signal.sosfilt(top_cut, rounded)


dry = scene()
out = record(dry)
unload_audio(out)
```